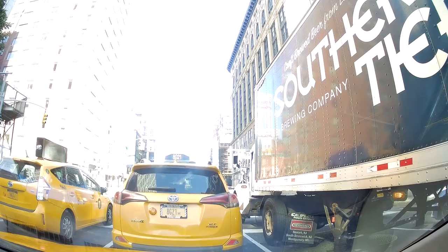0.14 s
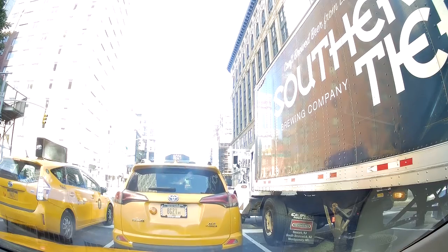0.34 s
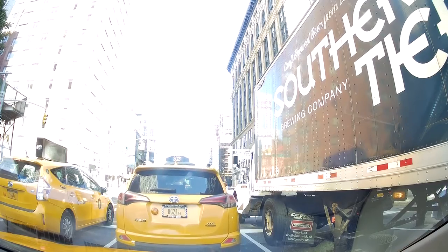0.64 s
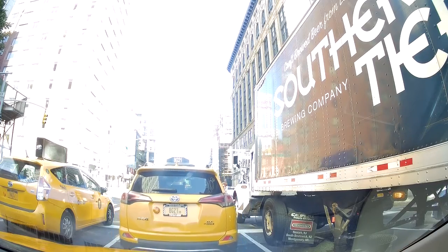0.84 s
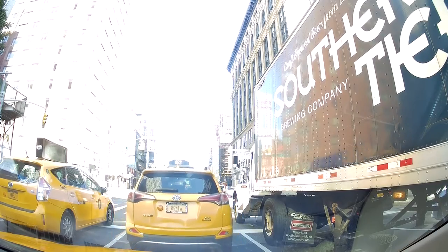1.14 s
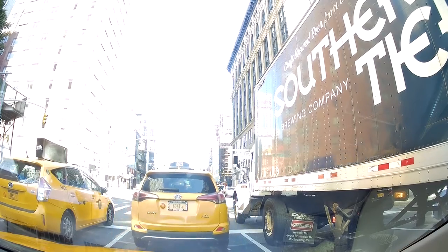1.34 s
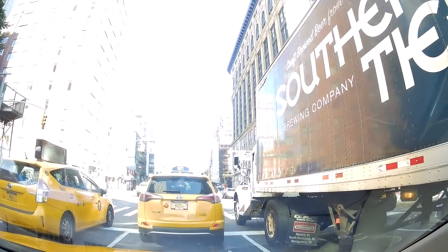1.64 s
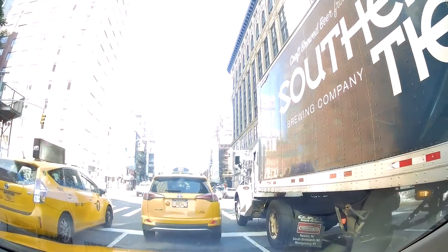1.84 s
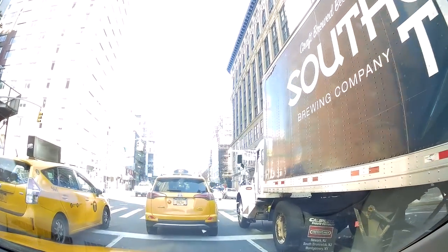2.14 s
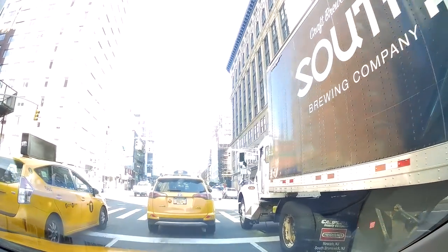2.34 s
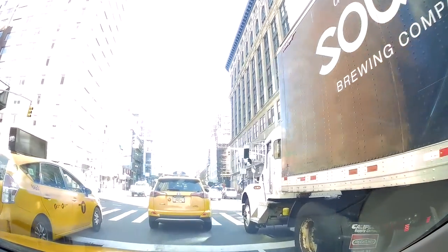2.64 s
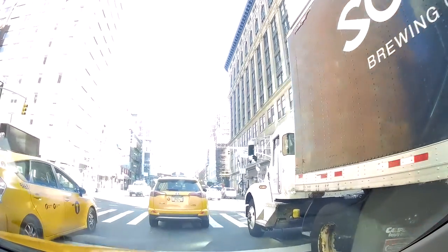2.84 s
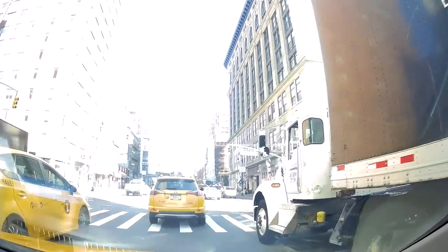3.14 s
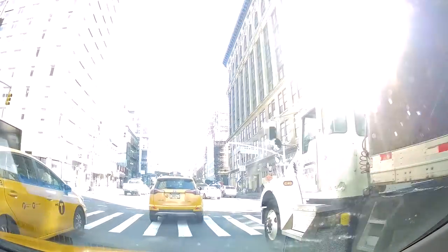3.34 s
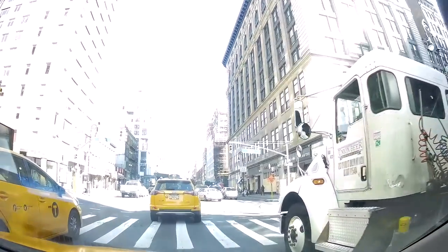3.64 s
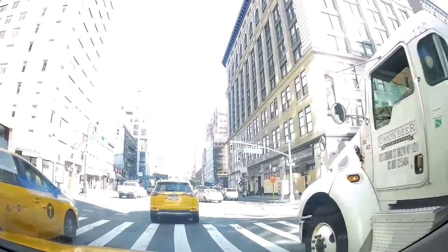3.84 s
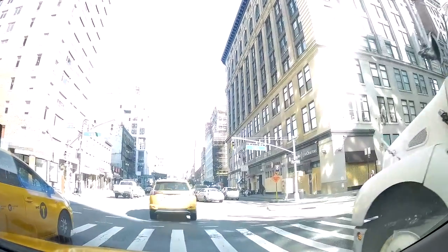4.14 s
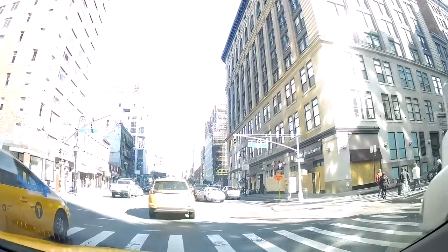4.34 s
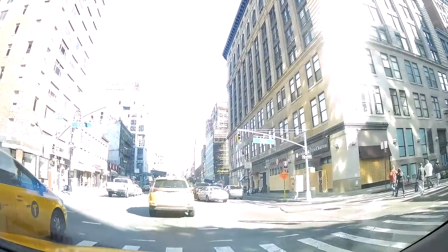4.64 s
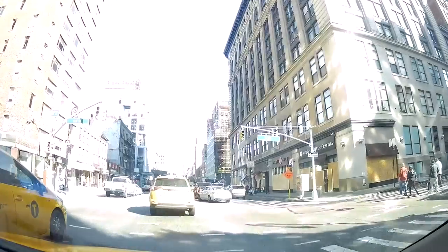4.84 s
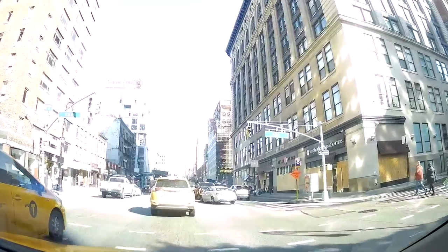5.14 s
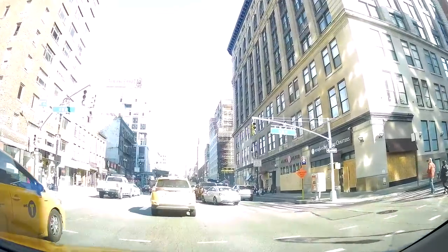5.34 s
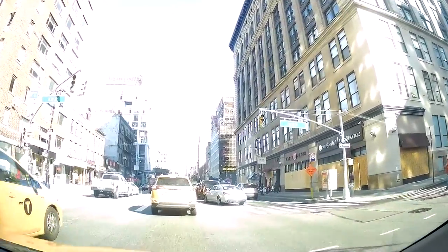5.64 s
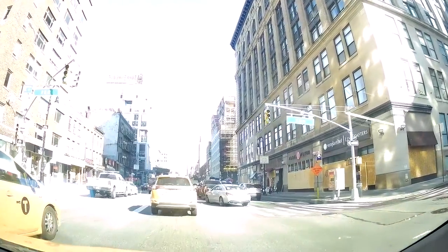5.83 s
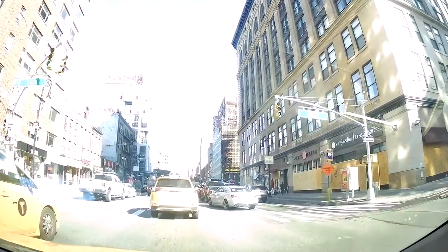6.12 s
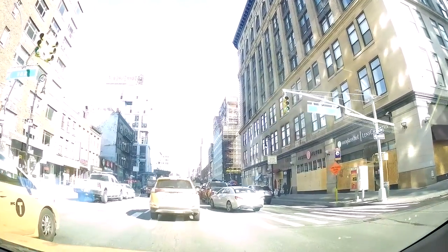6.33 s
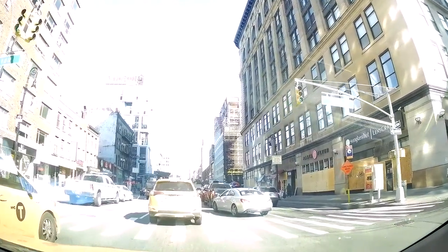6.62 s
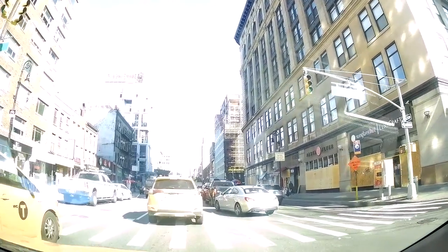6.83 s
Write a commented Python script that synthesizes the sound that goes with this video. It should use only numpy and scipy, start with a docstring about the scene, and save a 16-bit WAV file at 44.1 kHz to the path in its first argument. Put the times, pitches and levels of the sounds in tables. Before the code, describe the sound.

Heard from behind the windscreen of a closed car in city traffic: a deep engine idle with a flurry of hard plastic clacks. The car moves off, the boom swells, and tyre rumble, muffled street wash and panel knocks join. Near the middle a lorry's brake groans twice, squeals downward and hisses. The engine then climbs to a smooth, fuller drone with scattered bumps.

```python
"""First you hear the low boom of an idling engine inside a car, soon joined by clacks of loose plastic.
The car pulls away: the boom climbs with the engine's firing rate and the transmission whines.
Filtered noise makes the tyre rumble and street wash; short ringing tones and noise make the bumps.
Outside, a lorry's air brake groans, squeals with a falling pitch and hisses."""
import sys
import numpy as np
from scipy import signal
from scipy.fft import rfft, irfft
from scipy.io import wavfile
from scipy.ndimage import uniform_filter1d

SR = 44100
rng = np.random.default_rng(int(sys.argv[2]) if len(sys.argv) > 2 else 0)


def wrap_up_sound(samples):
    """Save the sound to the file named by the first command line argument, as 16-bit audio."""
    columns = np.atleast_2d(samples).T
    # keep every value between -1 and 1, then stretch to whole-number steps
    tamed = np.clip(columns, -1, 1)
    steps = np.round(tamed * 32767).astype(np.int16)
    wavfile.write(sys.argv[1], SR, steps)


N = 307818
TIME = np.arange(N) / SR

# engine speed: (time [s], firing rate [Hz])
FIRING_RATE = [(0, 35.15), (1.4, 34.85), (2.0, 39.54), (2.82, 45.14), (3.35, 36.5), (3.85, 36.8),
               (4.08, 44.6), (4.55, 54.6), (4.92, 59.46), (5.7, 63.58), (6.98, 65.13)]
# presses of the accelerator: (time [s], held [s], boom above idle [dB])
THROTTLE_PRESSES = [(1.38, 1.35, 10), (3.5, 3.65, 10.5)]
THROTTLE_RISE_S, THROTTLE_FALL_S = 0.23, 0.38
# brief dips of the boom: (time [s], half length [s], change [dB])
BOOM_SAGS = [(1.697, 0.035, -14), (2.262, 0.021, -12), (3.384, 0.15, -4), (3.826, 0.1, -5)]
IDLE_BOOM_DB = -33.5   # before the cabin lift and the wavering
BOOM_HZ, BOOM_WIDTH_HZ, BOOM_LIFT_DB = 59.47, 1.1, 5.5   # the cabin booms most at this firing rate
LABOUR_DB, SMOOTH_ABOVE_HZ = 5, 45.4   # at low revs under load the boom wavers more

# swells of transmission whine: (time [s], length [s], first pitch [Hz], last pitch [Hz], peak level [dB])
WHINE_SWELLS = [(1.33, 0.31, 324, 309, -42), (1.95, 0.52, 313.4, 346, -45),
                (3.6, 0.349, 366.3, 396.6, -37.5)]
# breathy whistles under load: (pitch [Hz], time [s], held [s], attack [s], fall by 60 dB [s], level [dB])
LOAD_WHISTLES = [(3063, 2.97, 2.24, 1.22, 9.5, -59), (4560, 3.87, 0.76, 0.37, 2.2, -60)]

# loose plastic clacks: (time [s], level before an 8 dB cut [dB], treble against bass [dB],
# lift of the hollow middle [dB], length against a usual clack [ratio])
PLASTIC_CLACKS = [(.137, -16.5, -12, 7.5, 0.86), (.342, -21.5, -5, 3.5, 0.6), (.365, -31, -.5, -4, 0.49),
                  (.419, -10.5, 0, -1.5, 1.26), (.471, -13.5, -2, 1.5, 1.16),
                  (.549, -13.5, -4.5, -1.5, 0.8), (.683, -22.5, -20, 2.5, 1.3), (.708, -26.5, -14, 1, 0.59),
                  (1.462, -31, 5.5, 0, 0.66), (2.376, -21, -16, 0, 0.76), (2.503, -24, -9, -1, .6),
                  (2.628, -28, -20, 0, 0.76), (2.936, -22, -2, 3, 0.76), (3.623, -24, 2.5, -2, 0.96),
                  (4.11, -21.5, -9, 2.5, 1.3), (4.195, -20.5, -2.5, 1.5, 0.71),
                  (4.281, -22.5, -3, 3.5, .67), (4.312, -22, -20, 0, 0.55), (4.348, -22.5, -5.5, 2.5, 1.15),
                  (5.211, -27, -22, 2, .67), (5.246, -21.5, -22, 2, 0.78), (5.726, -42, 25, -3, 0.59),
                  (5.81, -25, -14, 3, 1.24), (6.057, -19, -19, 5, .7), (6.897, -26.5, -23, 3, 0.77)]
# spectrum of the crunch in a clack: (frequency [Hz], level per Hz [dB])
CLACK_SPECTRUM = [(60, -8), (100, 3), (150, -7), (190, 3.5), (290, -8), (500, -2), (680, -7.5), (900, -5.5),
                  (1250, -11), (1800, -16), (3200, -15.5), (4400, -14.5), (5600, -28), (7800, -18.5),
                  (10000, -38.5), (15000, -48)]
# ringing pitches of the dashboard: (pitch [Hz], relative level [dB], fall by 60 dB [s])
DASHBOARD_RINGS = [(96.6, 1.5, 0.27), (193, -3, 0.19), (422, -5.5, 0.13), (531, 7.5, 0.059),
                   (824, -18, 0.034), (1032, -5.5, 0.11), (1480, 4, 0.023), (2130, -10.5, 0.095),
                   (3660, -27, 0.032), (4570, -26, 0.032)]
HOLLOW_HZ, HOLLOW_OCTAVES = 1400, 0.59
RATTLE_DB, RATTLE_TREBLE_DB, RATTLE_LENGTH = 0, -6, 0.69   # small clacks; level against the road's roughness
JOSTLE_SCATTER_DB = 3.5   # spread of small clacks and faint knocks

# trim panel knocks: (time [s], knocks in the run [count], level before a 1 dB cut [dB], main pitch [Hz])
PANEL_KNOCKS = [(1.463, 1, -25.5, 464), (1.589, 1, -24.5, 447), (1.613, 1, -22.5, 430),
                (1.765, 3, -23.5, 471), (2.338, 1, -20, 457), (2.406, 1, -26.5, 450),
                (2.806, 1, -21.5, 468), (2.87, 1, -25, 468), (2.957, 1, -25, 445), (2.894, 1, -22, 500),
                (3.126, 1, -21.5, 439), (3.159, 2, -23.5, 451), (3.534, 1, -25, 450), (3.834, 2, -17, 441),
                (3.87, 1, -25.5, 450), (3.996, 3, -15.5, 474), (4.229, 1, -20.5, 452),
                (5.17, 1, -28.5, 499.8), (5.216, 1, -24, 468), (5.359, 1, -26, 448), (6.895, 1, -28.5, 443)]
# ringing pitches of the panel: (pitch [Hz], relative level [dB], fall by 60 dB [s])
PANEL_RINGS = [(528, -4.5, 0.063), (676, -12, 0.1), (835, -15.5, 0.054), (1020, -28, 0.098),
               (1166, -27, 0.11), (1350, -37, 0.043)]
ROCK_S, RUN_ENDS_DB = .0798, -4.5   # rocking period; a longer run is quieter at its ends
FAINT_KNOCK_DB = -0.5   # faint knocks in between, against the road's roughness

# low and round suspension thumps: (time [s], level before a 5 dB cut [dB], pitch [Hz])
SUSPENSION_THUMPS = [(0.149, -20, 223), (0.433, -16, 190), (0.484, -20, 178), (0.557, -18, 168),
                     (3.124, -21.5, 198), (5.209, -21, 196.7), (5.254, -17.5, 194), (5.806, -24, 133)]

# the two alternating ticks: (ring pitch [Hz], ring level before later gains [dB],
# body level before later gains [dB])
TICK_ENDS = [(12400, -47.5, -50), (7260, -44.5, -43.5)]
TICK_START_S, TICK_GAP_S, FIRST_TICK_DB = 2.388, .048, 8.5

# standing waves of the cabin: (pitch [Hz], width [Hz], level [dB])
CABIN_RESONANCES = [(545, 5.8, -7), (662, 24, -3), (991, 26, -3), (1161, 17, 1), (1396, 30, -6),
                    (2084, 22, -11)]

# brake groans: (time [s], length [s], first pitch [Hz], last pitch [Hz], peak level [dB])
BRAKE_GROANS = [(2.635, .085, 958, 1024, -33), (2.732, 0.087, 1055, 988, -32)]
SQUEAL_S, SQUEAL_HOLD_S, SQUEAL_ATTACK_S, SQUEAL_T60_S = 2.916, 0.12, 0.021, 0.19
SQUEAL_HZ, SQUEAL_SAG_HZ_PER_S, SQUEAL_DB = 2923, 2050, -30
BREAK_S, BREAK_DROP_HZ = 3.008, 85.4   # the squeal breaks up and steps down
AIR_S, AIR_HOLD_S, AIR_ATTACK_S, AIR_T60_S, AIR_DB = 3.004, .19, 0.069, 1.16, -40.5
# spectrum of the escaping air: (frequency [Hz], level per Hz [dB])
AIR_SPECTRUM = [(1200, -22), (2100, -7.5), (2450, 0), (3300, 4), (4500, -6), (5500, -11), (7500, -17.5),
                (10000, -22), (15000, -25)]

# the car's speed: (time [s], share of cruising speed [0-1])
CAR_SPEED = [(1.2, 0), (1.6, 0.45), (4.8, 1), (6.98, 0.88)]
# rough road: (time [s], length [s], tyre roughness [dB], gritty wash [dB], body shake [dB])
ROUGH_PATCHES = [(1.295, 0.26, -39.5, -50, -39), (2.344, 0.64, -33, -40.5, -30),
                 (3.047, .14, -42, -46.5, -31), (3.522, 0.07, -33, -49.5, -42), (3.82, .4, -40, -51, -34),
                 (4.147, 0.21, -34.5, -43.5, -24.5), (4.312, .1, -33.5, -38.5, -31),
                 (5.169, 0.09, -44, -43.5, -24), (5.675, 0.072, -47, -53, -19),
                 (6.523, 0.12, -43.5, -62, -31)]
PATCH_ATTACK_S, PATCH_T60_S = 0.059, 0.99
# tyre rumble: (level at rest [dB], level added at cruising speed [dB], power of speed [number])
TYRE_LEVELS = (-47, -43, 0.078)
# street wash: (level at rest [dB], level added at cruising speed [dB], power of speed [number])
WASH_LEVELS = (-54.5, -50.5, 0.53)
SHAKE_REST_DB, SHAKE_CRUISE_DB = -45.5, -34   # the second is added in proportion to speed
# spectrum of the body shake: (frequency [Hz], level per Hz [dB])
SHAKE_SPECTRUM = [(12, -21), (24, 16.5), (36, 14), (50, 6), (80, 5), (120, -1), (200, -59.5)]
# spectrum of the tyre rumble: (frequency [Hz], level per Hz [dB])
RUMBLE_SPECTRUM = [(50, 12), (90, -2.5), (145, 0.5), (185, 2.5), (240, 2), (340, -2), (460, -6), (580, -27),
                   (900, -21), (2000, -53)]
# spectrum of the street wash: (frequency [Hz], level per Hz [dB])
STREET_SPECTRUM = [(250, 0.5), (450, 9.5), (660, 4.5), (850, 2), (1050, 0.5), (1400, -3), (1850, -15),
                   (2500, -16), (3100, -18.5), (3800, -26.5), (4500, -22.5), (5400, -33), (8000, -35),
                   (15000, -67)]
# spectrum of the faint high hiss: (frequency [Hz], level per Hz [dB])
HISS_SPECTRUM = [(800, 4), (3000, 3), (4600, -3.5), (5600, -4.5), (7200, -5.5), (10000, -6.5),
                 (15000, -13.5)]
# level of the faint high hiss: (time [s], level [dB])
HISS_LEVEL = [(0, -59), (.3, -55.5), (.8, -60), (.97, -58.5), (1.7, -60), (6.98, -60.5)]

CUTOFF_HZ = 15500


def from_db(db):
    """Decibels to gain."""
    return 10 ** (np.asarray(db) / 20)


def rms_one(x):
    """Scale to an rms (average strength) of 1."""
    return x / np.sqrt(np.mean(x ** 2) + 1e-20)


def in_time(rows):
    """Each column of a curve at every sample."""
    s, *columns = np.transpose(rows)
    return [np.interp(TIME, s, column) for column in columns]


def at_hz(points, hz):
    """Read a spectrum on a log-frequency axis."""
    f, db = np.transpose(points)
    return np.interp(np.log(np.maximum(hz, 1)), np.log(f), db)


def noise(spectrum):
    """Steady noise with the given spectrum, falling away below it; rms 1."""
    hz = np.arange(N // 2 + 1) * SR / N
    skirt = np.minimum(hz / spectrum[0][0], 1) ** 2
    white = rfft(rng.standard_normal(N))
    return rms_one(irfft(white * skirt * from_db(at_hz(spectrum, hz)), N))


def drift(rate):
    """Smooth chance that changes about rate times a second; spread 1."""
    size = 2 ** 16
    hz = np.arange(size // 2 + 1) * SR / N
    slow = irfft(rfft(rng.standard_normal(size)) / (1 + (hz / rate) ** 2) ** 2, size)
    return np.interp(np.linspace(0, size - 1, N), np.arange(size), rms_one(slow))


def phase_of(hz):
    """Running phase of a moving pitch."""
    return 2 * np.pi * np.cumsum(hz) / SR


def add(out, s, sound):
    """Mix a short sound in at time s."""
    i = max(int(s * SR), 0)
    out[i:i + len(sound)] += sound[:N - i]


def swell(t, rise):
    """A contact that builds up and dies away; height 1 after two rise times."""
    return (t / (2 * rise)) ** 2 * np.exp(2 - t / rise)


def random_sine(hz, t):
    """A steady sine that starts anywhere in its cycle."""
    return np.sin(2 * np.pi * (hz * t + rng.random()))


def envelope(s, held, attack, t60):
    """Opens at s over the attack time and dies away once the held time is over; height 1."""
    fall = from_db(-60 * np.clip((TIME - s - held) / t60, 0, 3))
    return np.clip((TIME - s) / attack, 0, 1) * fall


def tone(hz, overtones_db, width_hz, rough):
    """A tone with overtones; rough (0-1) is the share that turbulence spreads into a narrow band."""
    phase, rough = phase_of(hz + np.zeros(N)), np.clip(rough, 0, 1)
    spread = np.sqrt(rough / 2)
    wave = 0
    for k, db in enumerate([0, *overtones_db], 1):
        in_step = (np.sqrt(1 - rough) + spread * drift(width_hz * k)) * np.sin(k * phase)
        out_of_step = spread * drift(width_hz * k) * np.cos(k * phase)
        wave = wave + from_db(db) * (in_step + out_of_step)
    return np.sqrt(2) * wave


def glides(rows):
    """Pitch and gain of a row of notes; each slides evenly while it swells and fades."""
    points = [point for s, length, first, last, _ in rows for point in ((s, first), (s + length, last))]
    hz, = in_time(points)
    gain = sum(from_db(db) * np.sin(np.pi * np.clip((TIME - s) / length, 0, 1)) ** 2
               for s, length, _, _, db in rows)
    return hz, gain


def jostles(rough, level_db, count):
    """Random moments (time [s], level [dB]), stronger where the road is rougher."""
    times = (np.arange(count) + rng.random(count)) / count * TIME[-1]
    road_db = 20 * np.log10(np.interp(times, TIME, rough) + from_db(TYRE_LEVELS[0]))
    return list(zip(times, road_db + level_db + JOSTLE_SCATTER_DB * rng.standard_normal(count)))


def throttle():
    """How far each press of the accelerator lifts the boom, in dB."""
    push_db = 0
    for s, held, db in THROTTLE_PRESSES:
        rising = (TIME - s) / THROTTLE_RISE_S
        falling = 1 - (TIME - s - held) / THROTTLE_FALL_S
        push_db = push_db + db * np.clip(np.minimum(rising, falling), 0, 1)
    return push_db


def engine(second_db=-43, third_db=-54):
    """Each firing pushes the cabin air, so the boom follows the firing rate, harder under throttle."""
    hz, = in_time(FIRING_RATE)
    push_db = throttle()
    lift_db = BOOM_LIFT_DB / (1 + ((hz - BOOM_HZ) / BOOM_WIDTH_HZ) ** 2)
    low_revs = np.clip((SMOOTH_ABOVE_HZ - hz) / 10, 0, 1)
    waver_db = 0.69 + LABOUR_DB * push_db / push_db.max() * low_revs
    sag_db = sum(db * np.exp(-((TIME - s) / half) ** 2) for s, half, db in BOOM_SAGS)
    phase = phase_of(hz * (1 + 0.0074 * drift(12.4)))
    boom_db = IDLE_BOOM_DB + push_db + sag_db + lift_db + waver_db * np.tanh(drift(18))
    boom = from_db(boom_db) * np.sin(phase)
    overtones = sum(from_db(db + 2.0 * drift(4.9)) * np.sin(k * phase)
                    for k, db in ((2, second_db), (3, third_db)))
    # the faster the revs climb, the stronger the overtones
    climb_hz_per_s = uniform_filter1d(np.gradient(hz) * SR, size=SR // 3)
    load = np.interp(climb_hz_per_s, [0, 12], [.25, 1])
    return np.sqrt(2) * (boom + load * overtones)


def drivetrain():
    """The transmission whines in short swells; two breathy whistles come up under load."""
    hz, gain = glides(WHINE_SWELLS)
    out = gain * tone(hz, overtones_db=[-18], width_hz=52.0, rough=0.91)
    for hz, s, held, attack, t60, db in LOAD_WHISTLES:
        whistle = tone(hz, overtones_db=[], width_hz=640, rough=0.87)
        out = out + from_db(db) * envelope(s, held, attack, t60) * whistle
    return out


def rattles(rough):
    """Small clacks among the large ones, in the same columns."""
    return [(s, db, RATTLE_TREBLE_DB, 0, RATTLE_LENGTH) for s, db in jostles(rough, RATTLE_DB, count=70)]


def clacks(rows, rise=0.0048, lag_of_lows=0.11, tail_db=-17, tail_t60=0.5, rings_db=-9):
    """Each clack is a crunch of tiny contacts: treble first, lows later, while the dashboard rings."""
    t, out = np.arange(SR // 4) / SR, np.zeros(N)
    crunch = noise(CLACK_SPECTRUM)
    edges = np.geomspace(60, 16000, 9)
    centres = np.sqrt(edges[1:] * edges[:-1])
    bands = np.array([signal.sosfilt(signal.butter(2, pair, "band", fs=SR, output="sos"), crunch)
                      for pair in zip(edges, edges[1:])])
    treble = at_hz([(400, 0), (3000, 1.17), (6000, 1.16), (12000, 0.74)], centres)
    soft_top = at_hz([(2500, 0.32), (5000, 0.33), (12000, 0.61)], centres)
    hollow = np.exp(-(np.log2(centres / HOLLOW_HZ) / HOLLOW_OCTAVES) ** 2 / 2)
    for s, db, bright_db, hollow_db, length in rows:
        rises = (rise * length * (1000 / centres) ** lag_of_lows)[:, None]
        tail = from_db(tail_db - 60 * t / tail_t60) * (1 - np.exp(-t / rises))
        shape = swell(t, rises) + tail
        # a soft contact loses still more at the top
        tilt_db = hollow_db * hollow + bright_db * treble + min(bright_db, 0) * soft_top
        i = rng.integers(N - len(t))
        hit = from_db(tilt_db) @ (shape * bands[:, i:i + len(t)])
        for hz, ring_db, t60 in DASHBOARD_RINGS:
            strength_db = rings_db + ring_db + np.interp(hz, centres, tilt_db) + rng.normal(0, 2.5)
            hit += from_db(strength_db - 60 * t / t60) * (1 - np.exp(-t / rise)) * random_sine(hz, t)
        loudest = np.sqrt(uniform_filter1d(hit ** 2, size=441).max())   # over 10 ms
        add(out, s, from_db(db - 8.0) * hit / loudest)
    return out


def panel_blows(rough, pitch_scatter=0.022, faint_hz=450, faint_scatter=0.11):
    """Each knock of the rocking panel, then the faint ones in between: (time [s], level [dB], pitch [Hz])."""
    blows = []
    for s, count, db, hz in PANEL_KNOCKS:
        for k in range(round(count)):
            end_db = RUN_ENDS_DB * (1 - np.sin(np.pi * (k + .5) / round(count)))
            blows.append((s + k * ROCK_S, db + end_db, hz * (1 + pitch_scatter * rng.standard_normal())))
    for s, db in jostles(rough, FAINT_KNOCK_DB, count=60):
        blows.append((s, db, faint_hz * (1 + faint_scatter * rng.standard_normal())))
    return blows


def knocks(rough, rise=0.003, ring_db=-20, ring_t60=0.41, scuff_db=-19, scuff_rise=0.007):
    """A padded trim panel rocks against its seat: a few round cycles, a scuff and a faint ring."""
    t, out = np.arange(SR // 4) / SR, np.zeros(N)
    no_lows = signal.butter(2, 560, "high", fs=SR, output="sos")
    rubbing = rms_one(signal.sosfilt(no_lows, noise(STREET_SPECTRUM)))
    contact = (1 - np.exp(-t / rise)) ** 2
    for s, db, hz in panel_blows(rough):
        ring = from_db(ring_db - 60 * t / ring_t60) * contact
        bump = (swell(t, rise) + ring) * random_sine(hz, t)
        for mode_hz, mode_db, t60 in PANEL_RINGS:
            strength = rng.uniform(.5, 1.5)
            bump += strength * from_db(mode_db - 60 * t / t60) * contact * random_sine(mode_hz, t)
        i = rng.integers(N - len(t))
        scuff = from_db(scuff_db) * swell(t, scuff_rise) * rubbing[i:i + len(t)]
        add(out, s, from_db(db - 1) * (bump + scuff))
    return out


def thumps(rise=0.0043, tail_db=-12, t60=0.12):
    """A jolt sets the cabin air booming for a few cycles."""
    t, out = np.arange(SR // 4) / SR, np.zeros(N)
    tail = from_db(tail_db - 60 * t / t60) * (1 - np.exp(-t / rise))
    for s, db, hz in SUSPENSION_THUMPS:
        add(out, s, from_db(db - 5.0) * (swell(t, rise) + tail) * np.sin(2 * np.pi * hz * t))
    return out


def ticks(count=13, rise=0.0034, width=0.32, body_hz=2300, body_width=0.51, ring_db=-13.0, body_db=-6):
    """Something small and hard lands on both its ends, then ticks to and fro, high and low in turn."""
    t, out = np.arange(SR // 20) / SR, np.zeros(N)
    run = [(TICK_START_S, FIRST_TICK_DB, end) for end in TICK_ENDS]
    run += [(TICK_START_S + k * TICK_GAP_S, 0, TICK_ENDS[k % 2]) for k in range(1, count)]
    for s, accent_db, (hz, peak, body) in run:
        ring_part = (hz, width, peak + ring_db + accent_db)
        body_part = (body_hz, body_width, body + body_db)
        for f, share, db in (ring_part, body_part):
            b, a = signal.iirpeak(f, 1 / share, fs=SR)
            once = signal.lfilter(b, a, rng.standard_normal(len(t)))
            add(out, s, from_db(db) * swell(t, rise) * rms_one(signal.lfilter(b, a, once)))
    return out


def lorry_brake(flutter_db=2.0, wobble=0.0052):
    """Two short groans, then the air valve squeals, sags in pitch, breaks up and lets the air go."""
    hz, gain = glides(BRAKE_GROANS)
    groans = gain * tone(hz, overtones_db=[-24, -18], width_hz=73, rough=0.97)
    breakup = np.interp(TIME - BREAK_S, [-.03, .01], [.15, .95])
    sag_hz = SQUEAL_SAG_HZ_PER_S * np.clip(TIME - SQUEAL_S, 0, .11)
    hz = (SQUEAL_HZ - sag_hz - BREAK_DROP_HZ * (TIME > BREAK_S)) * (1 + wobble * drift(74))
    opening = envelope(SQUEAL_S, SQUEAL_HOLD_S, SQUEAL_ATTACK_S, SQUEAL_T60_S)
    gain = from_db(SQUEAL_DB + flutter_db * drift(50)) * opening
    squeal = gain * tone(hz, overtones_db=[-22], width_hz=124, rough=breakup)
    release = envelope(AIR_S, AIR_HOLD_S, AIR_ATTACK_S, AIR_T60_S)
    air = from_db(AIR_DB + drift(40)) * release * noise(AIR_SPECTRUM)
    return groans + squeal + air


def neighbour(idle_hz=69.0, idle_db=-45):
    """A neighbour's idling engine hums steadily and fades as it is left behind."""
    fade = np.interp(TIME, [3.7, 4.4], [1, 0])
    hum = np.sqrt(2) * np.sin(2 * np.pi * idle_hz * TIME)
    return from_db(idle_db + 0.78 * drift(5.5)) * hum * fade


def patches():
    """How hard the rough patches work on the tyres, the wash and the springs, as three gains."""
    return sum(from_db(dbs)[:, None] * envelope(s, length, PATCH_ATTACK_S, PATCH_T60_S)
               for s, length, *dbs in ROUGH_PATCHES)


def car_speed():
    """Share of cruising speed at every sample."""
    return np.maximum(in_time(CAR_SPEED)[0], 1e-9) * (TIME > CAR_SPEED[0][0])


def rolling_db(levels, patch):
    """Powers at rest, from speed and from rough patches add up to one level in dB."""
    rest, cruise, power = levels
    moving = from_db(cruise) * car_speed() ** abs(power)
    return 10 * np.log10(from_db(rest) ** 2 + moving ** 2 + patch ** 2)


def body_shake(jolts):
    """The car body shakes as deep noise, more with speed and on rough patches."""
    steady = from_db(SHAKE_REST_DB) + from_db(SHAKE_CRUISE_DB) * car_speed()
    return np.hypot(steady, jolts) * noise(SHAKE_SPECTRUM)


def tyres(rough, cavity_hz=186, cavity_db=-3):
    """Tyres rumble in lumps; the air inside them drones once they roll freely."""
    level_db = rolling_db(TYRE_LEVELS, rough)
    rumble = from_db(level_db + 2.6 * drift(40)) * noise(RUMBLE_SPECTRUM)
    cavity = rms_one(signal.lfilter(*signal.iirpeak(cavity_hz, 6, fs=SR), noise(RUMBLE_SPECTRUM)))
    drone = from_db(level_db + cavity_db) * np.interp(TIME, [4.3, 5], [0, 1]) * cavity
    return rumble + drone


def street_wash(grit):
    """Street noise comes through the glass, grainier on a rougher road, over a faint high hiss."""
    level_db = rolling_db(WASH_LEVELS, grit)
    grain_db = np.interp(level_db, [-52, -41], [1, 3])
    wash = from_db(level_db + 1.0 + grain_db * drift(60)) * noise(STREET_SPECTRUM)
    return wash + from_db(in_time(HISS_LEVEL)[0]) * noise(HISS_SPECTRUM)


def cabin(x):
    """The closed cabin adds a few narrow resonances to the sound passed through it."""
    return x + sum(from_db(db) * signal.lfilter(*signal.iirpeak(hz, hz / width, fs=SR), x)
                   for hz, width, db in CABIN_RESONANCES)


def scene():
    """Everything as heard behind the windscreen."""
    rough, grit, jolts = patches()
    road = body_shake(jolts) + tyres(rough) + street_wash(grit)
    resonating = cabin(road + clacks(PLASTIC_CLACKS + rattles(rough)))
    bumps = knocks(rough) + thumps() + ticks()
    return (engine() + drivetrain() + resonating + bumps + lorry_brake() + neighbour())[None]


def record(dry):
    """The sound opens and closes softly; the top is cut steeply."""
    ends = np.clip(np.minimum(TIME, TIME[-1] - TIME) / .004, 0, 1)
    top_cut = signal.ellip(10, .2, 80, CUTOFF_HZ, fs=SR, output="sos")
    return signal.sosfilt(top_cut, dry * ends)


dry = scene()
out = record(dry)
wrap_up_sound(out)
```